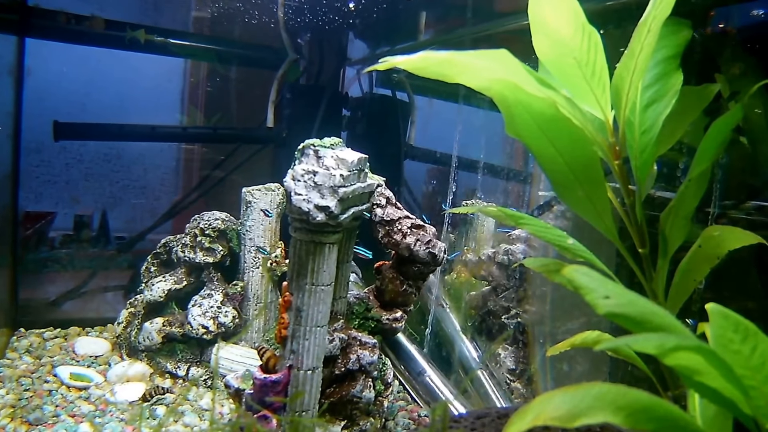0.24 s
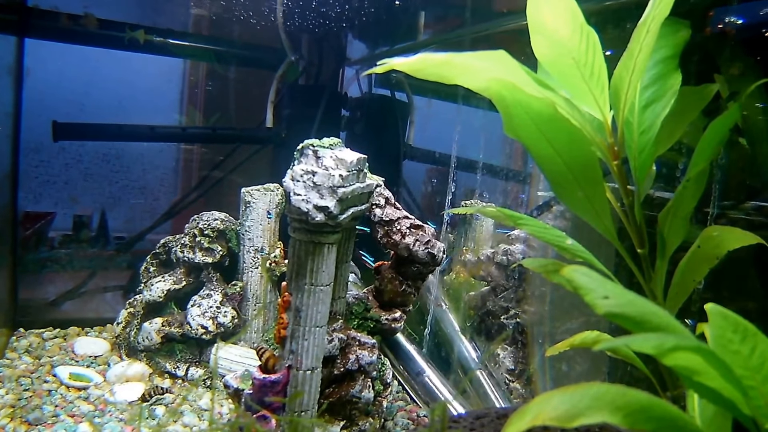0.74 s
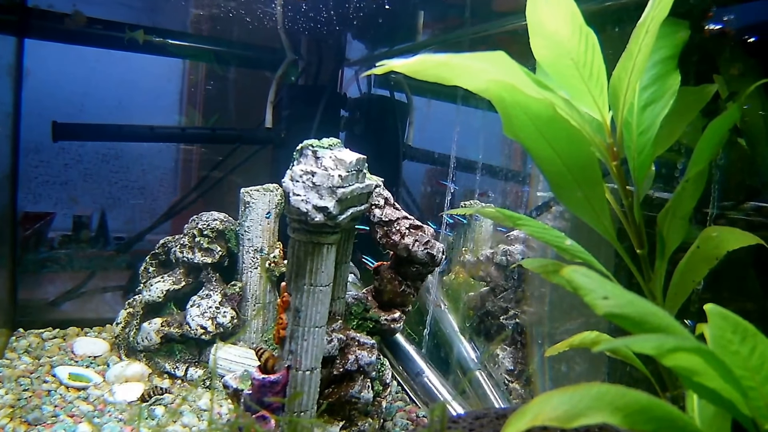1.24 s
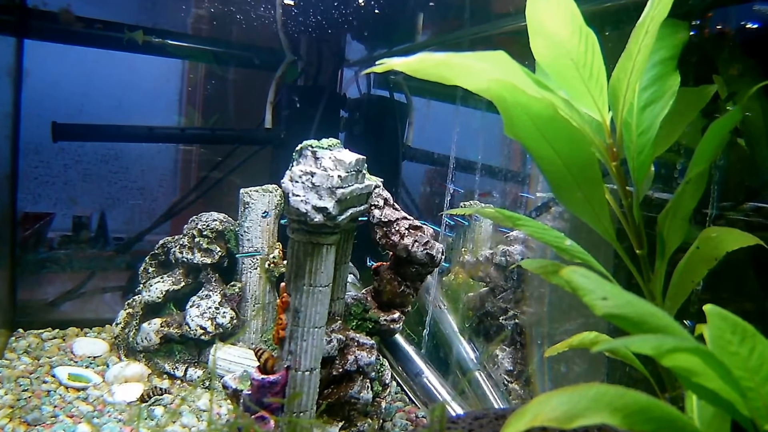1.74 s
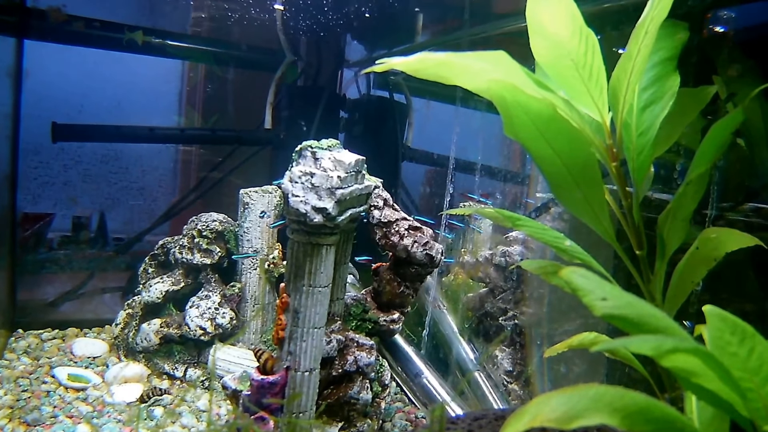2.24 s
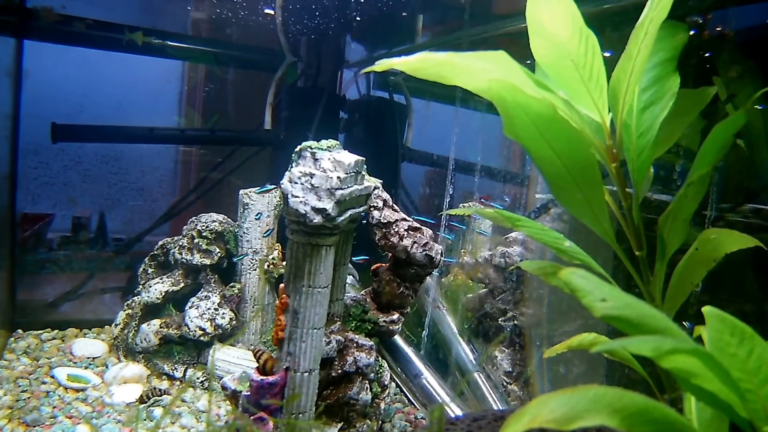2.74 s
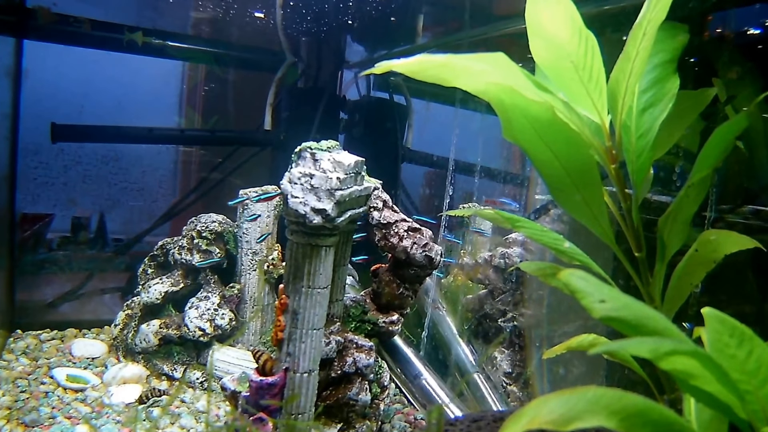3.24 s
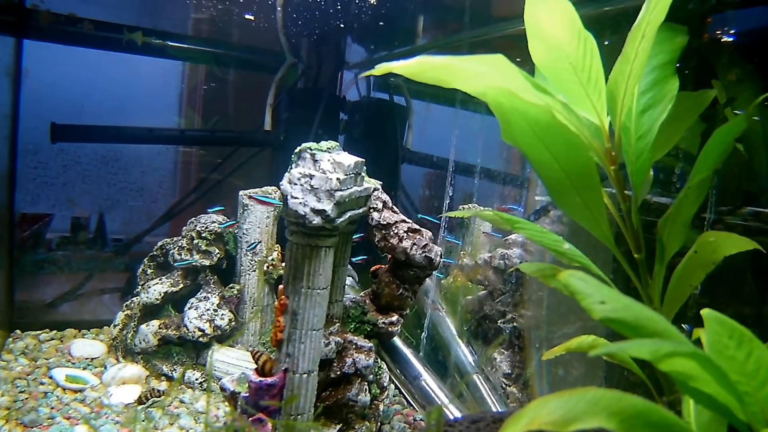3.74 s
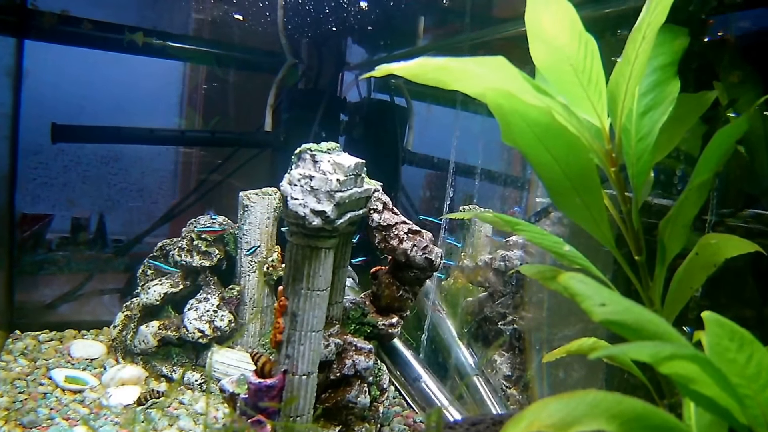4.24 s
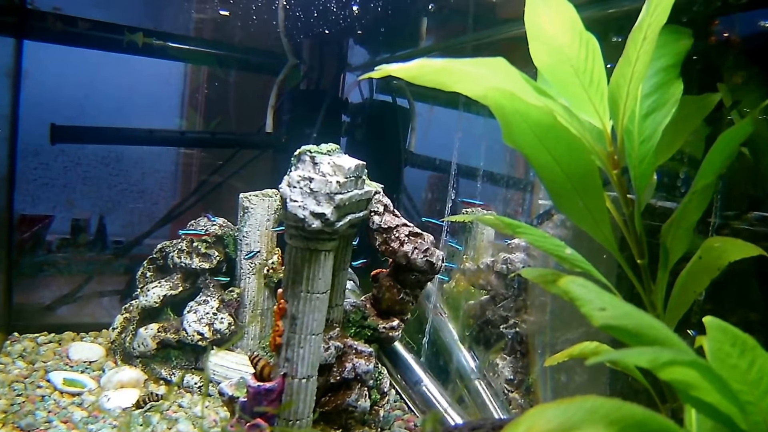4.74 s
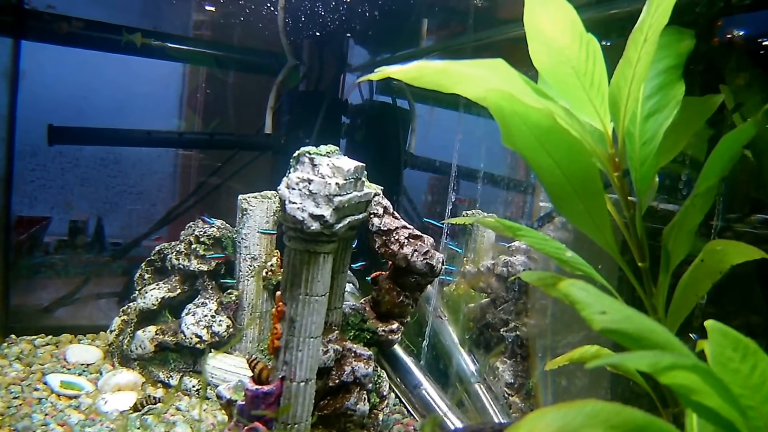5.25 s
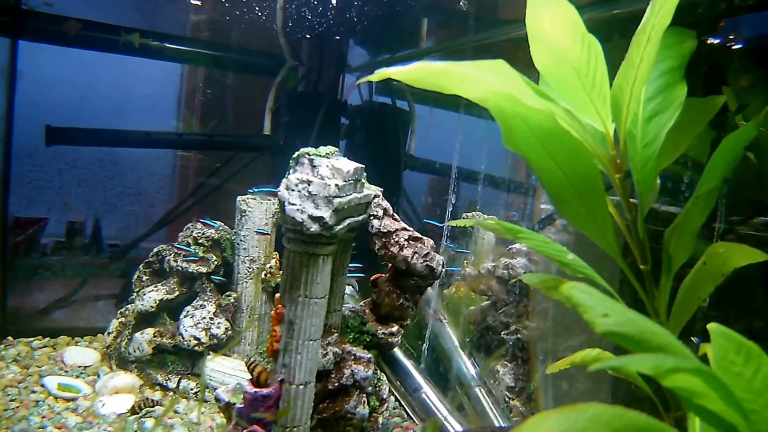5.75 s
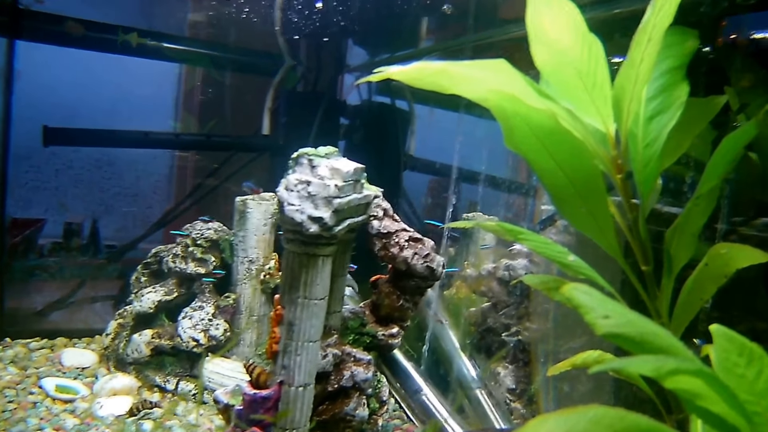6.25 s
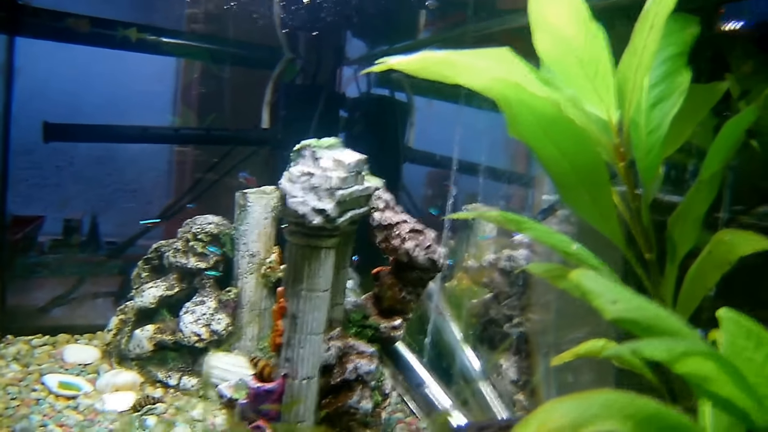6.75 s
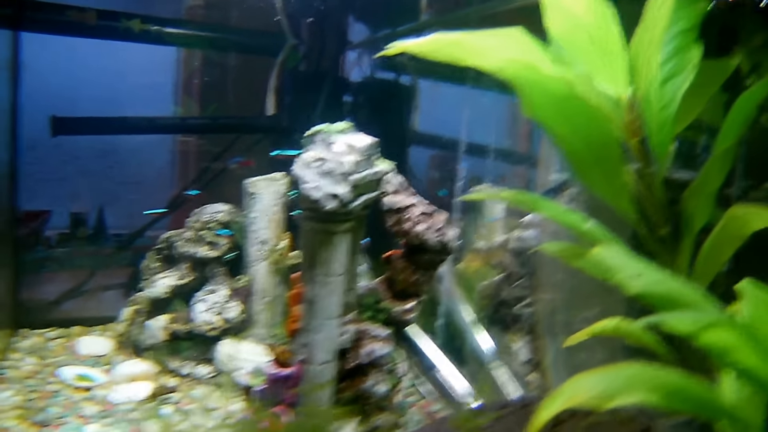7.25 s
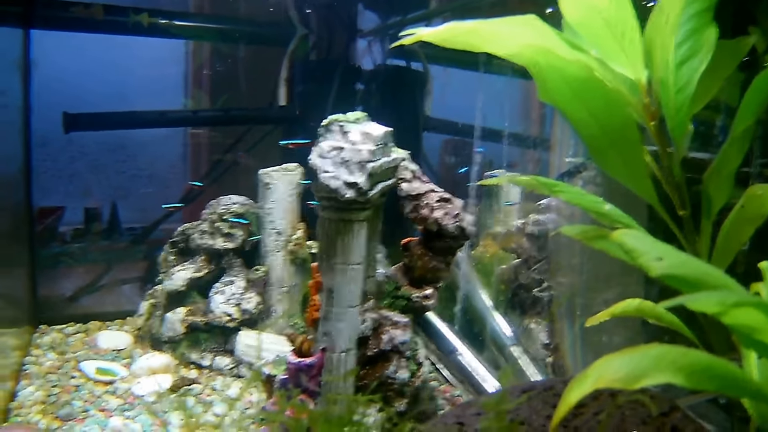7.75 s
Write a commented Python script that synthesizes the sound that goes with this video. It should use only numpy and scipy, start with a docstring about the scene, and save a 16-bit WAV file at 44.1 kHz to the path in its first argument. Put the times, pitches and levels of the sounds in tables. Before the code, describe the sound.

Close to a fish tank in a quiet room, a filter motor drones evenly while pumped water swirls and fizzes, with small bubbles bursting in faint high pings. Late on, low handling rumble creeps into the microphone. A hard knock on the camera body suddenly jumps out, far louder than the tank, followed by a scatter of light, dull clicks and faint finger rubbing over the continuing hum.

```python
"""An aquarium filter runs in a quiet room, heard from just in front of the glass.
Its mains motor hums, and the pumped water rushes and fizzes, making the housing and tank ring.
Bubbles burst at the surface with tiny pings. Near the end a hand shifts the camera it holds:
a soft rumble, one hard double knock and light taps."""
import sys
import numpy as np
from scipy import signal
from scipy.fft import rfft, irfft
from scipy.io import wavfile
from scipy.ndimage import uniform_filter1d

SR = 44100
rng = np.random.default_rng(int(sys.argv[2]) if len(sys.argv) > 2 else 0)


def materialize(psi):
    """Save the field psi as 16-bit PCM at rate SR to the path in sys.argv[1].

    A 1-D psi becomes a single channel; in a 2-D psi each row is a channel.
    """
    bounded = np.clip(np.atleast_2d(psi).T, -1, 1)
    quanta = np.round(bounded * 32767).astype(np.int16)
    wavfile.write(sys.argv[1], SR, quanta)


N = 351918
TIME = np.arange(N) / SR
FREQS = np.fft.rfftfreq(N, 1 / SR)


def gain(db):
    """Turn decibels into a number to multiply by."""
    return 10 ** (np.asarray(db) / 20)


def unit(x):
    """Scale a signal to an average (rms) strength of 1."""
    return x / np.sqrt(np.mean(x ** 2))


def white_noise():
    """Noise that is equally strong at every pitch: 0 dB per Hz."""
    return rng.standard_normal(N) * np.sqrt(SR / 2)


def shaped_noise(points):
    """Noise that follows a curve of (frequency [Hz], level [dB per Hz]) points."""
    hz, db = np.transpose(points)
    curve_db = np.interp(np.log(FREQS + 1), np.log(hz), db)
    return irfft(rfft(white_noise()) * gain(curve_db), N)


def resonate(x, hz, width_hz):
    """Keep the sound near one pitch by passing it twice through the same band filter."""
    single_width = width_hz / np.sqrt(np.sqrt(2) - 1)
    band = 1j * FREQS * single_width / (hz ** 2 - FREQS ** 2 + 1j * FREQS * single_width)
    return irfft(rfft(x) * band ** 2, N)


def wander(per_s):
    """A smooth random curve of typical size 1 that changes about `per_s` times a second."""
    hold = int(SR / per_s)
    steps = np.repeat(rng.standard_normal(N // hold + 1), hold)[:N]
    return unit(uniform_filter1d(uniform_filter1d(steps, hold), hold))


# Tones of the motor's hum: (multiple of the mains frequency, relative level [dB])
HUM_TONES = [(1, 3.5), (2, -9.5), (3, 0.5), (4, -6.5), (5, -9), (6, -2), (7, -40), (8, -17.5), (9, -14),
             (10, -42), (11, -54), (12, -24), (13, -23.5), (14, -16.5)]
# The pump wheel's chatter, repeating every second turn: (mains multiple, relative level [dB])
CHATTER_TONES = [(9.5, -62.5), (10.5, -74), (11.5, -62.5), (15.5, -73.5), (18.5, -79.5), (19.5, -78)]


def motor(mains_hz=49.985, hum_db=-40, chatter_gain_db=-7, waver_db=0.28):
    """The motor's tones are locked to the mains; the changing water load makes each waver a little."""
    def tone(multiple, db):
        phase = 2 * np.pi * (multiple * mains_hz * TIME + rng.random())
        drift_db = waver_db * np.sqrt(multiple) * wander(per_s=2.64)
        return np.sqrt(2) * gain(db + drift_db) * np.sin(phase)
    hum = sum(tone(multiple, db) for multiple, db in HUM_TONES)
    chatter = sum(tone(multiple, db) for multiple, db in CHATTER_TONES)
    return gain(hum_db) * unit(hum) + gain(chatter_gain_db) * chatter


# The broad rush of the water: (frequency [Hz], level [dB per Hz])
WATER_RUSH = [(10, -86), (30, -81), (75, -92), (140, -80), (180, -72.5), (310, -76.5), (520, -81),
              (850, -85), (1100, -92.5), (1600, -105.5), (2400, -104.5), (3600, -110), (4700, -118),
              (8000, -135)]
# Where housing and tank ring: (pitch [Hz], width [Hz], peak level [dB per Hz])
TANK_RESONANCES = [(113.3, 8.9, -72.5), (238.3, 29, -69), (271.2, 31, -74.5), (384, 104, -78.5),
                   (441.6, 23, -77.5), (647.4, 56, -76.5), (795, 100, -81.5), (1158, 80, -88),
                   (1338, 66, -85), (1523, 70, -85), (1692, 62, -83.5), (1746, 38, -85), (1875, 81, -85),
                   (2007, 72, -82), (2260, 188, -88), (2780, 280, -99), (3192, 138, -89), (3920, 220, -104),
                   (4190, 290, -106)]


def water(pops_per_s=1000, pop_spread_db=1, fizz_hz=2210, gurgle_db=0.3, flurry_db=2.5):
    """Swirling water rings the tank's low pitches; flurries of tiny bursting bubbles ring the high ones."""
    out = shaped_noise(WATER_RUSH)
    for hz, width_hz, db in TANK_RESONANCES:
        fizz_share = hz ** 2 / (hz ** 2 + fizz_hz ** 2)
        # each resonance answers to bubbles of its own size, so it gets its own pops
        sizes = gain(pop_spread_db * np.minimum(rng.exponential(size=N), 4))
        signs = rng.choice([-1, 1], N)
        bursts = rng.random(N) < pops_per_s / SR
        pops = unit(sizes * signs * bursts) * np.sqrt(SR / 2)  # as strong as the white noise
        drive = np.sqrt(fizz_share) * pops + np.sqrt(1 - fizz_share) * white_noise()
        swell_db = (gurgle_db + flurry_db * fizz_share) * wander(per_s=18)
        out += gain(db + swell_db) * resonate(drive, hz, width_hz)
    return out


# Small bubbles, close to pitches at which the tank rings: (pitch [Hz], peak level [dB])
SMALL_BUBBLE_KINDS = [(1730, -56), (2000, -56), (2260, -56), (3190, -61.5)]
# The loudest bubbles: (time [s], pitch [Hz], peak level [dB])
LOUD_BUBBLES = [(.714, 1990, -52), (.806, 2240, -51), (.891, 2007, -52), (1.735, 3130, -55),
                (1.841, 2006, -48), (2.83, 1983, -52), (3.935, 3190, -56), (5.082, 1737, -52),
                (6.042, 1740, -50)]


def bubbles(small_per_s=7, detune=0.012, spread_db=1.5, ring_s=0.0072, rise=0.28):
    """Each bubble bursts at the surface with a ping that swells, fades and rises slightly in pitch."""
    pings = list(LOUD_BUBBLES)
    for _ in range(int(small_per_s * N / SR)):  # small ones burst at random times
        hz, db = rng.choice(SMALL_BUBBLE_KINDS)
        hz *= 1 + rng.uniform(-detune, detune)
        db += rng.uniform(-spread_db, spread_db)
        pings.append((rng.uniform(0, N / SR), hz, db))
    t = TIME[:SR // 10]
    swell = t / ring_s * np.exp(1 - t / ring_s)
    out = np.zeros(N + len(t))
    for start, hz, db in pings:
        first = int(start * SR)
        out[first:first + len(t)] += gain(db) * swell * np.sin(2 * np.pi * hz * t * (1 + rise * t))
    return out[:N]


# The hand's low rumble and the skin's rustle: (frequency [Hz], relative level [dB])
HAND_RUMBLE = [(12, -21), (42, -3), (75, -5.5), (108, -1), (150, -13), (220, -10.5), (500, -18),
               (1500, -61)]
SKIN_RUSTLE = [(300, -2), (1500, -5), (3500, -1), (6300, -11), (8000, -35)]
# Fingers slipping on the case: (middle time [s], length [s], rumble level [dB], rustle level [dB])
FINGER_SLIPS = [(6.85, .08, -46, -71), (7.24, .11, -50, -75), (7.39, 0.15, -42, -70), (7.96, .05, -42, -85)]


def hand(start_s=5.36, tighten_s=0.69, grip_db=-50.5):
    """A tightening grip rumbles through the camera; at each slip the rumble swells and skin rustles."""
    rumble_level = gain(grip_db) * np.clip((TIME - start_s) / tighten_s, 0, 1)
    rustle_level = 0
    for middle, length, rumble_db, rustle_db in FINGER_SLIPS:
        swell = np.exp(-2 * ((TIME - middle) / length) ** 2)
        rumble_level = np.hypot(rumble_level, gain(rumble_db) * swell)
        rustle_level = np.hypot(rustle_level, gain(rustle_db) * swell)
    rumble = rumble_level * unit(shaped_noise(HAND_RUMBLE))
    rustle = rustle_level * unit(shaped_noise(SKIN_RUSTLE))
    return rumble + rustle


# Tones the camera's case rings at: (pitch [Hz], relative level [dB], time to fade by 60 dB [s])
CASE_TONES = [(55, -27, 0.2), (123, -13, 0.26), (235, -15, 0.18), (269, -6.5, 0.085), (354, 10, 0.043),
              (497, 3.5, 0.038), (574, -5.5, 0.049), (640, -21.5, 0.17), (788, -10, 0.043),
              (834, -3.5, 0.022), (1163, -8, 0.028), (1410, -12.5, 0.033), (2000, -21, 0.024),
              (2800, -24, 0.0085), (3980, -16, 0.0056)]
# The noise in a knock's click: (frequency [Hz], relative level [dB])
CLICK_NOISE = [(500, 12), (1500, -0.5), (4000, -12.5), (5500, -23.5), (7000, -38), (15000, -46)]
# Knocks on the case: (time [s], ring peak [dB], brightness [Hz], favoured pitch [Hz], its boost [dB])
CASE_KNOCKS = [(6.7772, 8, 1240, 790, 4.5), (6.7848, -2.5, 1700, 261, 16), (6.846, -26.5, 169, 120, 16),
               (6.9807, -16, 900, 287, 23), (7.0362, -27.5, 1620, 950, 10), (7.172, -28.5, 1100, 600, -5),
               (7.2, -21, 1050, 378, 0.5), (7.2297, -21.5, 1200, 520, 0), (7.250, -26, 950, 800, 3),
               (7.327, -16.5, 950, 633, 20), (7.338, -29, 1300, 750, -12), (7.407, -24, 2500, 1450, 14.5),
               (7.876, -14.5, 1050, 370, 8), (7.88, -24, 130, 70, 14)]


def knocks(favour_octaves=0.42, click_s=0.0035, buzz_db=-8, buzz_s=0.028, hard_db=-7, crack_db=21):
    """Each knock clicks and rings the camera's case; soft ones are dull, a hard one adds a sharp crack."""
    t = TIME[:SR // 2]
    out = np.zeros(N + len(t))
    hz, db, fade_s = np.transpose(CASE_TONES)[:, :, None]
    tones = np.sin(2 * np.pi * hz * t) * gain(-60 * t / fade_s)
    grit = unit(shaped_noise(CLICK_NOISE))
    # a click builds while the surfaces press together and dies at once; the case buzzes a moment longer
    age = np.log(1000) * t / click_s
    press = age * np.exp(1 - age)
    buzz = gain(buzz_db - 60 * t / buzz_s) * (1 - np.exp(-age))
    for start, peak_db, bright_hz, favoured_hz, boost_db in CASE_KNOCKS:
        nearness = np.exp(-(np.log2(hz / favoured_hz) / favour_octaves) ** 2)
        ring = np.sum(gain(db + boost_db * nearness) * tones, axis=0)
        ring = signal.sosfilt(signal.butter(3, bright_hz, fs=SR, output="sos"), ring)
        click_db = -40 + 5.5 * np.log2(bright_hz / 1020)  # brighter knocks click more
        if peak_db > hard_db:
            click_db += crack_db
        click = gain(click_db) * (press + buzz) * np.roll(grit, rng.integers(N))[:len(t)]
        first = int(start * SR)
        out[first:first + len(t)] += gain(peak_db) * (ring / np.abs(ring).max() + click)
    return out[:N]


def scene():
    """The running filter and the hand on the camera, added up in one channel."""
    return (motor() + water() + bubbles() + hand() + knocks())[None]


# The converter's hiss: (frequency [Hz], level [dB per Hz])
CONVERTER_HISS = [(1000, -120), (5500, -121), (8000, -123), (12000, -123), (15500, -120)]


def record(dry):
    """The hard knock overloads the microphone, which rounds off its peaks and softens the treble; the converter
    adds hiss."""
    ceiling, treble_hz, top_hz = 0.97, 9000, 15800
    rounded = ceiling * dry / (ceiling ** 10 + dry ** 10) ** (1 / 10)
    dulled = signal.sosfilt(signal.butter(1, treble_hz, fs=SR, output="sos"), rounded)
    top_cut = signal.ellip(10, 0.1, 70, top_hz, fs=SR, output="sos")
    return signal.sosfilt(top_cut, dulled + shaped_noise(CONVERTER_HISS))


dry = scene()
out = record(dry)
materialize(out)
```